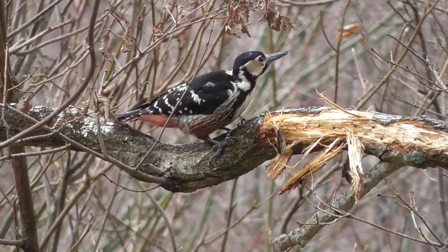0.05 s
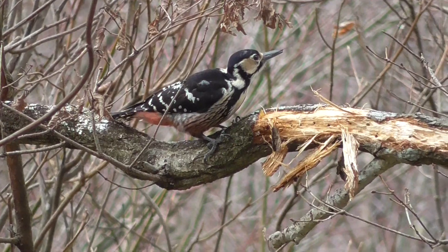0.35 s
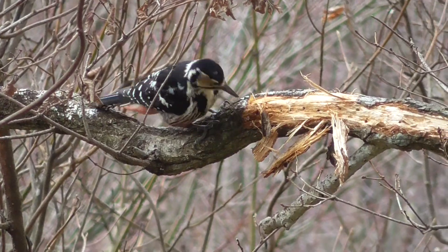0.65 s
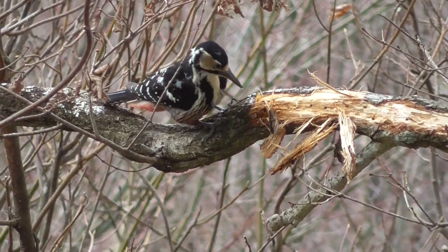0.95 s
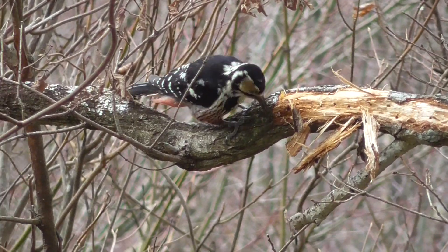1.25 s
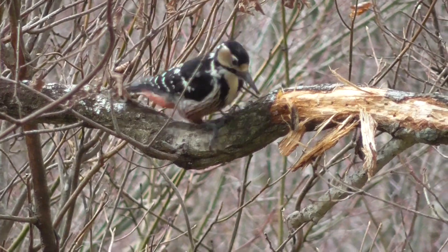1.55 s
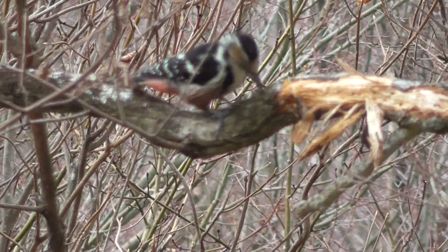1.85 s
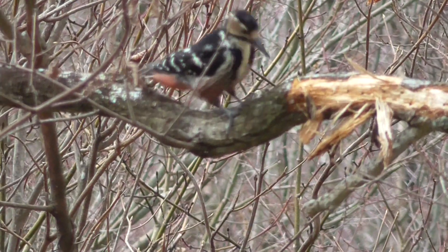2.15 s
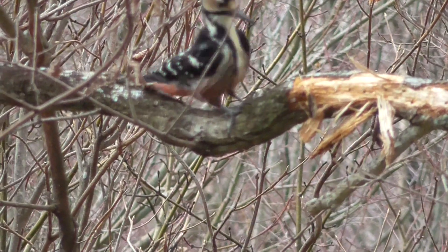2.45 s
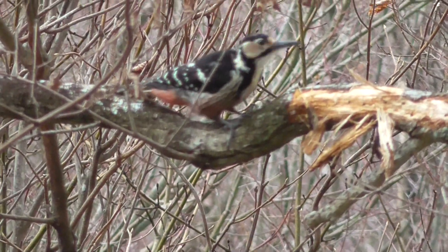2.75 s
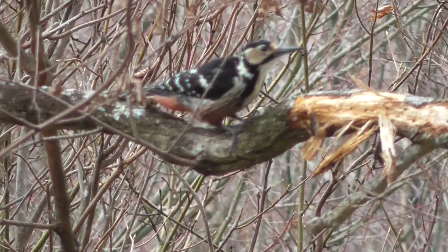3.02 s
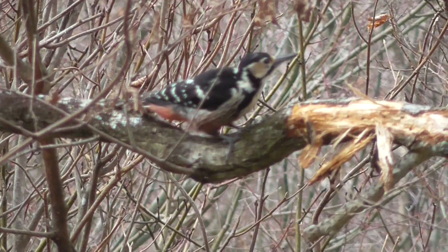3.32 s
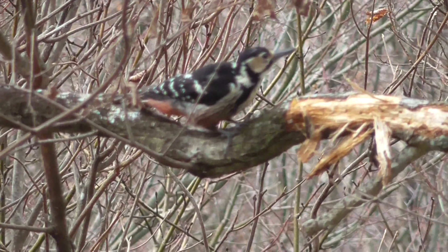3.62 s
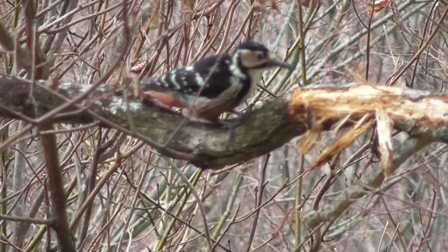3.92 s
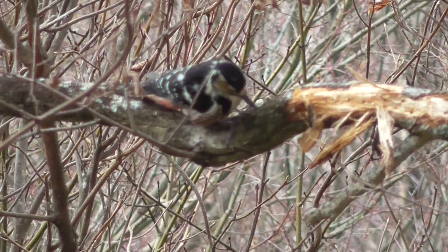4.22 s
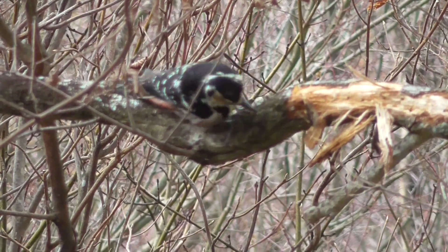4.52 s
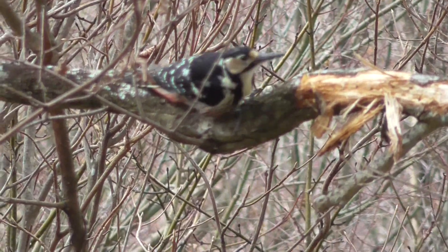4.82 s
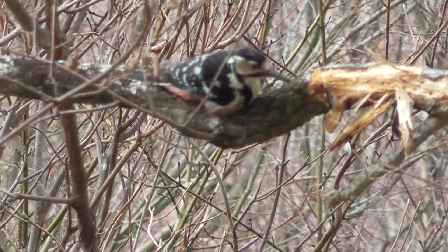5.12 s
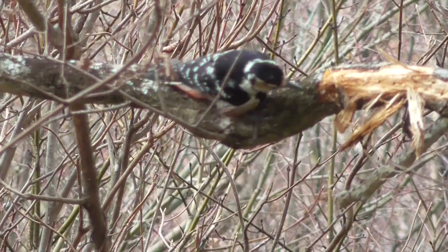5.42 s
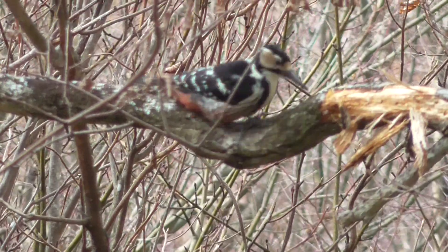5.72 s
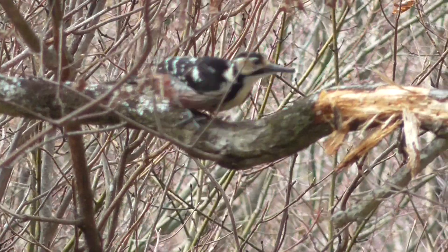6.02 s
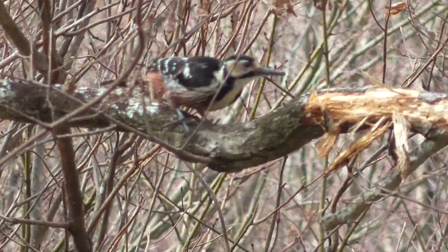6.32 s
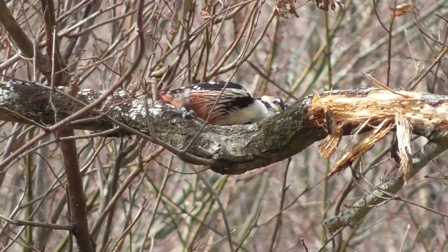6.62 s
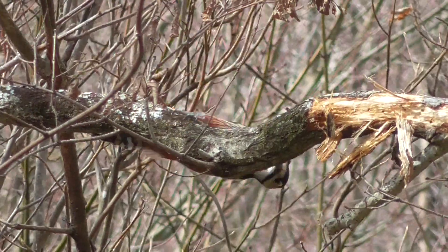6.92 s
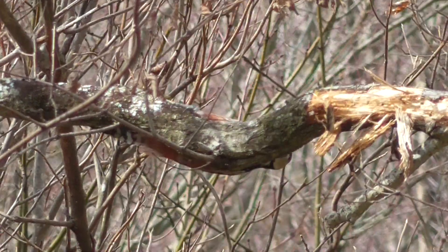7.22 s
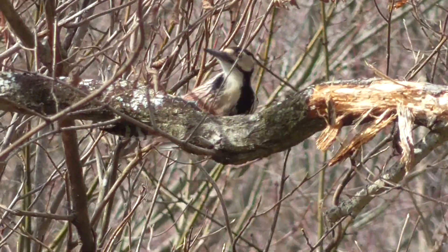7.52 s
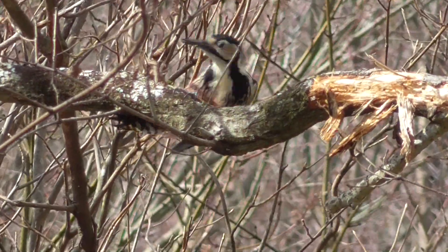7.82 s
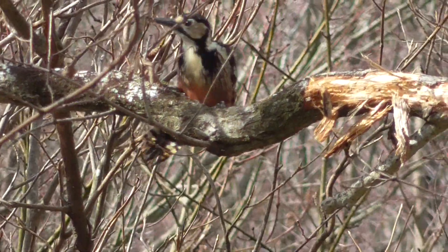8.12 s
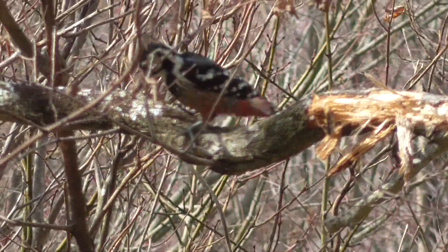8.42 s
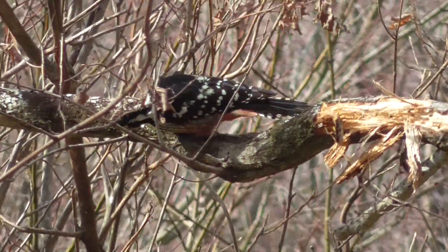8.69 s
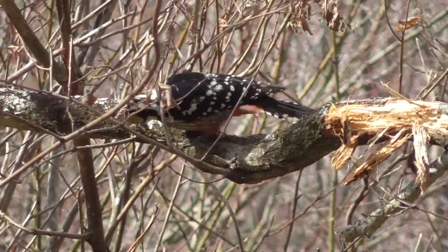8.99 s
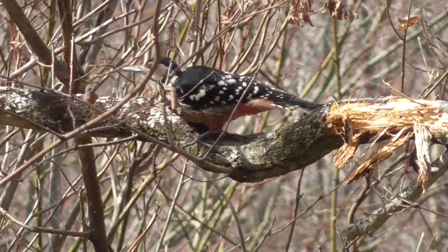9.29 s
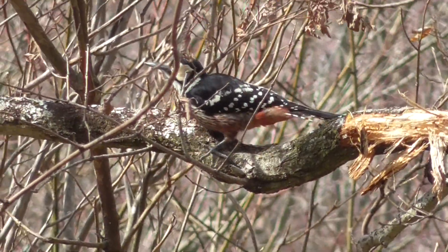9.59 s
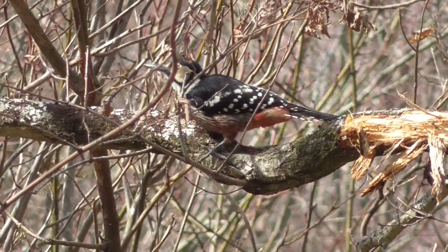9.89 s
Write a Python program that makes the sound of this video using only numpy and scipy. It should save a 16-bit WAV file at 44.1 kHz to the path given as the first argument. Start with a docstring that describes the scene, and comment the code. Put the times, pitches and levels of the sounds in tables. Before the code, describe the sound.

Gusty wind rumbles and thumps on the microphone while a woodpecker taps faintly and irregularly at a branch, snapping off bits of bark.

```python
"""Wind buffets a camera's two microphone ports in gusts and thumping eddies, over a bed of far forest
murmur and dry leaves hissing in the breeze. Through it a woodpecker works along a dead branch: bark
splinters snap, crumbs tick, the beak knocks the damp wood into a short ring and claws scrape, all
lightly scattered by the bare trunks. A faint, thin whine comes and goes."""
import sys
import numpy as np
from scipy import signal
from scipy.fft import rfft, irfft, next_fast_len
from scipy.io import wavfile
from scipy.ndimage import map_coordinates

SR = 44100
rng = np.random.default_rng(int(sys.argv[2]) if len(sys.argv) > 2 else 0)


def output_pcm(signal):
    """Save a mono or channel-first signal as 16-bit PCM at the path in sys.argv[1].

    Samples are clipped to [-1, 1] before scaling.
    """
    pcm = np.clip(np.atleast_2d(signal).T, -1, 1) * 32767
    wavfile.write(sys.argv[1], SR, np.round(pcm).astype(np.int16))


N = 438794

# draught on the ports: t/s, level/dB, left minus right/dB
DRAUGHT = [(0, -34.5, -4), (.08, -23.5, -10.5), (1.05, -24.5, -7), (1.3, -26.5, -10), (2.45, -27, -6.5),
           (2.52, -30.5, -8.5), (3.2, -27.5, -7), (3.3, -39, -3), (3.45, -36, -4), (4.08, -39, -3),
           (5.45, -33, -6.5), (5.99, -40.5, 1.5), (6.15, -26, -4.5), (6.25, -31.5, -3), (6.5, -26, -3),
           (6.9, -30, -4), (7.38, -34.5, -4), (7.8, -25.5, -9.5), (8.37, -24.5, -1), (8.46, -36, -13),
           (8.8, -26.5, -4), (8.89, -44, -12), (8.96, -32, -10), (9.95, -29.5, -8)]
# gusts riding on the draught: t/s, length/s, level/dB, left minus right/dB
PORT_GUSTS = [(1.201, 0.054, -23, -11), (1.622, .11, -22, -11.5), (1.839, 0.15, -22, -8.5),
              (2.308, 0.146, -23, -5.5), (2.628, 0.068, -21, -25), (2.785, 0.26, -23.5, -23),
              (3.425, 0.25, -29, -8), (3.729, 0.23, -30, -7.5), (4.224, 0.096, -28.5, 0.5),
              (4.449, 0.048, -26, -11), (4.528, 0.092, -27, -5), (4.865, 0.036, -25, -5),
              (5, 0.042, -27, 0), (5.116, 0.24, -25.5, 0.5), (6.589, 0.24, -20, -4), (7.44, 0.15, -23, -5),
              (7.847, 0.16, -17.5, -12), (8.07, 0.11, -21.5, -24), (8.54, 0.24, -39, -6.5),
              (9.02, 0.2, -24.5, -13), (9.242, 0.16, -24.5, -7), (9.529, 0.19, -19, -11),
              (9.739, 0.11, -18, -3.5)]
# tone of the buffeting: f/Hz, level/dB
BUFFET_SPECTRUM = [(15, -54), (30, -22), (50, -6.5), (75, 3), (140, 4.5), (230, -5.5), (330, -18.5),
                   (500, -34), (800, -47.5), (1500, -73), (3000, -90)]
# hard eddies hitting a port: t/s, peak/dB, f/Hz, port (L or R)
EDDY_HITS = [(0.17, -12.5, 174, "R"), (.428, -9.5, 207, "R"), (0.615, -11, 175, "R"),
             (.733, -7.5, 154, "R"), (.986, -9.5, 170, "R"), (1.055, -10, 158, "R"),
             (1.715, -25.5, 500, "R"), (1.916, -14, 153, "R"), (2.129, -18.5, 476, "R"),
             (2.281, -10.5, 174, "R"), (2.433, -21.5, 520, "R"), (2.473, -21, 436, "R"),
             (2.635, -13, 226, "R"), (2.668, -19.5, 432, "R"), (2.805, -5, 195, "R"), (2.857, -6, 184, "R"),
             (2.872, -10.5, 220, "R"), (2.928, -12, 161, "R"), (3.003, -21, 424, "R"),
             (3.244, -16, 150, "R"), (3.442, -9.5, 210, "R"), (3.515, -23, 400, "R"),
             (4.569, -12.5, 201, "R"), (4.894, -19, 196, "R"), (5.281, -19, 152, "L"),
             (6.271, -15.5, 143, "R"), (6.396, -11.5, 200, "R"), (6.595, -14, 197, "R"),
             (6.624, -8, 162, "R"), (6.64, -1, 138, "R"), (6.712, -23, 450, "R"), (6.785, -12, 139, "L"),
             (7.351, -21, 152, "R"), (7.656, -16.5, 194, "R"), (7.821, -8.5, 177, "R"),
             (7.892, -18, 368, "R"), (7.919, -10, 218, "R"), (8.278, -14, 155, "L"), (9.056, -13, 149, "R"),
             (9.318, -11, 133, "R"), (9.538, 0.5, 171, "R"), (9.559, -9.5, 310, "R"),
             (9.583, -12.5, 460, "R"), (9.706, -8, 140, "R"), (9.765, -8, 163, "R")]
# ride of the forest bed: t/s, level/dB
MURMUR_LEVEL = [(0, -53), (2, -54), (3.7, -55.5), (5.3, -54), (8, -53), (8.7, -53.5), (9.95, -53)]
# tone of the forest bed: f/Hz, level/dB
FOREST_SPECTRUM = [(30, 7), (120, 1.5), (300, 3.5), (700, -1.5), (1000, -5.5), (1400, -8.5), (1750, -17.5),
                   (2100, -15.5), (2800, -26.5), (5000, -22.5), (15000, -88)]
# ride of the breeze in the leaves: t/s, level/dB
BREEZE_LEVEL = [(0.0, -61), (0.25, -65), (0.69, -64), (2.19, -65.5), (3.4, -64.5), (3.95, -61),
                (4.3, -58.7), (5.8, -59), (8.53, -62.7), (9.95, -60.5)]
# tone of the dry leaves: f/Hz, level/dB
LEAF_SPECTRUM = [(800, -25), (2000, -1.5), (3000, 1.5), (4700, 4), (6200, 2.5), (8500, 5), (11000, 2.5),
                 (13500, -2.5), (16000, -8.5)]
# stereo width of both beds: f/Hz, side minus mid/dB
BED_WIDTH = [(100, -19), (400, -18), (800, -10), (1500, -8.5), (3000, -6.5), (5000, -5), (6500, -3),
             (8500, 3.5), (11000, -0.5), (15000, -1)]
# bark splinters breaking: t/s, peak/dB, f/Hz, crumble t60/s, ring trim/dB, wood trim/dB
SPLINTERS = [(0.113, -40, 3930, .012, 10, -14), (.347, -38.5, 4130, 0.0084, 2, -20),
             (.603, -41, 5350, 0.01, -5, -4), (.63, -41, 5000, .008, -6, -11),
             (.639, -33, 3910, 0.01, 2, -16), (.644, -36, 7200, 0.008, -10, -6.5),
             (.667, -54, 4500, 0.0089, -3, -6), (.695, -35.5, 3930, 0.017, 1, -17),
             (0.721, -46, 4500, 0.011, -3, 3), (0.748, -43, 3850, .02, 2, -6),
             (0.755, -45, 4400, 0.012, 0, -2), (0.774, -35, 3930, .013, 4, -20),
             (0.891, -43, 4000, .012, 1, -15), (1.153, -34.5, 5460, 0.0054, -7, -18),
             (1.354, -31.5, 8900, 0.0049, 5, -16), (1.6661, -32, 4100, 0.017, 2, -14.5),
             (1.671, -33.5, 9500, .013, 4, -17), (1.794, -40.5, 5030, 0.0078, 4, -5.5),
             (1.911, -39, 12000, 0.005, 10, -28), (2.576, -31, 4300, 0.0031, -10, -10),
             (3.32, -42, 4600, .008, 1, -22), (5.826, -34, 7000, 0.005, -6, -12),
             (5.833, -36, 5070, .011, 7, -8), (6.737, -30, 5000, 0.0023, -3, -11),
             (7.126, -31, 9000, 0.006, 5, -20), (8.949, -34.5, 7150, 0.007, 2, -15)]
# reverb of the trunks: f/Hz, t60/s
TRUNK_DECAY = [(300, 0.22), (2000, 0.14), (12000, 0.14)]
# spells of busy foraging: start/s, end/s, typical peak/dB, typical f/Hz
FORAGING_SPELLS = [(0.332, 1.148, -48, 1150), (1.402, 3.698, -52.5, 8400)]
# claw or beak tip flicking bark, and twigs touching: t/s, peak/dB, f/Hz
BARK_FLICKS = [(.404, -43.5, 1500), (.930, -47, 3200), (.940, -40.5, 2500), (1.04, -47, 1240),
               (2.178, -47, 1230), (2.576, -46, 3300), (2.936, -48, 9800), (3.028, -46, 9000),
               (3.701, -47, 1700), (6.33, -43, 8300), (6.472, -48, 2700), (6.835, -45, 2100),
               (6.87, -47.5, 1320), (7.115, -45, 3100), (8.11, -41, 9000)]
# beak on wood: t/s, peak/dB, f/Hz, crack re ring/dB, attack/s, decay factor
BEAK_HITS = [(0.348, -30.5, 860, -28, 0.00029, 0.66), (.445, -42, 880, -5, .001, 0.7),
             (.473, -41, 1120, 0, 0.00064, 0.66), (.744, -39.5, 970, -10, 0.0015, 1.3),
             (.877, -40, 715, -7, 0.0011, 1.1), (.970, -33.5, 820, -24, .0008, 0.61),
             (1.011, -38.5, 1200, -10, 0.00063, 0.55), (1.137, -48, 1200, 3, .002, 0.68),
             (1.1535, -26, 950, -12, 0.00031, 0.44), (1.354, -40, 800, -20, .0006, 1),
             (1.631, -43.5, 1290, -5, 0.0022, 1.4), (2.08, -44.5, 1350, -2, .001, 0.86),
             (3.134, -36, 1010, -34, 0.0031, 0.53), (3.181, -44, 1150, -20, .002, .7),
             (3.644, -37.5, 726, -29, 0.00072, 0.84), (4.681, -25.5, 725, -20, 0.017, .85),
             (4.769, -43, 890, -17, 0.0014, 0.92), (5.268, -41, 1130, -26, 0.0078, 0.83),
             (5.827, -43.5, 1150, -4, .001, 1), (6.014, -35, 720, -5.5, 0.00061, 0.73),
             (6.603, -38.5, 1300, -11, 0.0018, 0.63), (6.737, -31.5, 1150, -30, 0.0003, 0.42),
             (6.962, -42, 1360, -28, 0.0012, 0.79), (7.025, -28, 1290, -14, 0.0003, 0.62),
             (9.17, -33, 775, -27, 0.0011, 1.15), (9.828, -33, 704, -25, 0.0073, 1)]
# modes of the branch: ratio to the knock's pitch, level/dB, t60/s before the decay factor
BRANCH_MODES = [(.68, -20, 0.0042), (1, 6, 0.0095), (1.3, -4.5, 0.007), (1.9, -18, 0.0024)]
# claws scraping bark: t/s, length/s, level/dB, f/Hz
CLAW_SCRAPES = [(0.366, 0.18, -60, 1390), (0.56, 0.06, -64, 4000), (.66, 0.11, -64, 1400),
                (0.738, 0.024, -52, 4500), (0.93, 0.21, -57, 1020), (1.12, 0.059, -53.5, 1200),
                (2.044, 0.15, -59, 1070), (7.751, 0.56, -61.5, 1150), (8.42, .2, -62.5, 1350),
                (9.818, 0.056, -49.5, 850), (9.815, 0.32, -54.5, 1770), (9.82, 0.049, -55.5, 4000)]
# swells of the whine: t/s, length/s, level/dB
WHINE_SWELLS = [(.68, 0.5, -74), (2.0, 0.29, -72.5), (3.3, 0.35, -70), (3.92, .15, -68), (4.05, 0.44, -71),
                (8.46, .2, -68.5), (9.423, 0.13, -66)]
# soft rustles of leaves and feathers: t/s, length/s, level/dB, f/Hz
SOFT_RUSTLES = [(0.94, 0.18, -61.5, 6500), (4.36, 0.18, -54.5, 9500), (4.7, 0.11, -54, 9400),
                (8.95, 0.2, -54, 8000), (9.39, 0.16, -55, 7700)]


def amp(db):
    """Decibels to gain."""
    return 10 ** (np.asarray(db) / 20)


def unit(x):
    """Scale to rms 1."""
    return x / np.sqrt(np.mean(x ** 2) + 1e-20)


def peaked(x):
    """Scale to peak 1."""
    return x / (np.abs(x).max() + 1e-20)


def along(points, hz):
    """Read (f/Hz, value) points on a log axis."""
    f, v = np.transpose(points)
    return np.interp(np.log(hz + 1), np.log(f + 1), v)


def curves(rows):
    """One automation lane for each column after the time."""
    s, *cols = np.transpose(rows)
    return [np.interp(np.arange(N) / SR, s, c) for c in cols]


def wobble(rate, size=N):
    """Smooth random modulation, rate knots a second."""
    knots = rng.standard_normal(int(size * rate / SR) + 4)
    return map_coordinates(knots, [np.arange(size) * rate / SR], order=2)


def filtered(x, response):
    """Zero-phase EQ; response gives the gain at each frequency."""
    size = next_fast_len(N + SR // 4)
    return irfft(rfft(x, size) * response(np.fft.rfftfreq(size, 1 / SR)), size)[..., :N]


def band(x, hz, spread):
    """Band-pass from hz / spread to hz * spread, with both edges capped."""
    edges = [min(hz / spread, 12000), min(hz * spread, 15500)]
    return signal.sosfilt(signal.butter(2, edges, 'band', fs=SR, output='sos'), x)


def lowpass(x, hz):
    """Gentle treble roll-off."""
    return signal.sosfilt(signal.butter(2, hz, fs=SR, output='sos'), x)


def add(track, s, sound):
    """Mix a sound into the track at time s."""
    start = max(round(s * SR), 0)
    part = sound[..., :max(N - start, 0)]
    track[..., start:start + part.shape[-1]] += part


def diffuse(spectrum):
    """Stereo noise from all around, mid at rms 1."""
    mid, side = filtered(rng.standard_normal((2, N)), lambda hz: amp(along(spectrum, hz)))
    side = filtered(side, lambda hz: amp(along(BED_WIDTH, hz))) / np.std(mid)
    return np.array([unit(mid) + side, unit(mid) - side])


def flow_power(attack_s=0.023, release_s=0.022, sag_db=4):
    """Wind power at each port: the draught plus gusts that hit fast, sag and drop away."""
    t = np.arange(N) / SR
    pan = lambda lean_db: 1 / (1 + amp(np.outer([-2, 2], lean_db)))
    level_db, lean_db = curves(DRAUGHT)
    power = amp(level_db) ** 2 * pan(lean_db)
    for s, length, db, lean_db in PORT_GUSTS:
        rise = np.clip((t - s) / attack_s + .5, 0, 1)
        progress = np.clip((t - s) / length, 0, 1)
        release = np.exp(-np.clip((t - s - length) / release_s, 0, 20))
        power += (amp(db - sag_db * progress) * rise * release) ** 2 * pan(lean_db)
    return power


def buffet(level_db, lump_db=5.0, brighten=0.61):
    """Turbulence at one port: a flutter of short lumps, brighter when the flow is faster."""
    flow = unit(filtered(rng.standard_normal(N), lambda hz: amp(along(BUFFET_SPECTRUM, hz))))
    lumps = unit(amp(lump_db * np.tanh(wobble(rate=90))))
    highs = filtered(flow, lambda hz: 1 - 1 / (1 + (hz / 330) ** 4))
    speed = amp(level_db + 45.0) * lumps
    shelf_gain = speed ** brighten * amp(2.24 * wobble(rate=110))
    return amp(level_db) * lumps * (flow + highs * (shelf_gain - 1))


def wind(surge_db=1.32, crossfeed=0.25):
    """Unsteady flow on each port; the stereo circuit feeds each, inverted, to the other side."""
    levels_db = 10 * np.log10(flow_power()) + surge_db * wobble(rate=16)
    ports = np.array([buffet(level_db) for level_db in levels_db]) + eddies()
    return ports - crossfeed * ports[::-1]


def forest():
    """The far murmur of the forest: a dark bed, a touch to the left."""
    level_db, = curves(MURMUR_LEVEL)
    return amp(level_db + 0.098 * wobble(rate=7.7)) * diffuse(FOREST_SPECTRUM) * amp([[.5], [-.5]])


def leaves():
    """Dry leaves hiss with the breeze; the right port hears more of the very top."""
    level_db, = curves(BREEZE_LEVEL)
    hiss = amp(level_db + 0.95 * wobble(rate=19)) * diffuse(LEAF_SPECTRUM)
    return filtered(hiss, lambda hz: amp(np.outer([-1, 1], along([(6000, -0.32), (15000, 1.8)], hz))))


def self_noise(level_db=-71):
    """The microphone's own steady, fine hiss."""
    return amp(level_db) * unit(np.diff(rng.standard_normal((2, N + 1))))


def snaps():
    """A splinter parts with a crunch of fibres, which may set it ringing and tugs at the wood beneath."""
    out, t = np.zeros((2, N)), np.arange(SR // 16) / SR
    low_cut = signal.butter(4, 3200, 'high', fs=SR, output='sos')  # slivers radiate nothing low
    for s, db, hz, crumble_s, ring_db, wood_db in SPLINTERS:
        rise = 1 - np.exp(-t / (0.064 * crumble_s))
        decay = amp(-60 * t / crumble_s) + amp(-22 - 60 * t / 0.03)
        fibres = rng.standard_normal((2, len(t))) * rise * decay
        crunch = peaked(band(fibres, hz=np.sqrt(hz * 7800), spread=1.66))
        ring = peaked(band(fibres, hz=hz, spread=1.08))
        mid, side = signal.sosfilt(low_cut, crunch + amp(ring_db - 12) * ring)
        splinter = peaked(np.array([mid + 0.5 * side, mid - 1.36 * side]))
        wood = peaked(band(fibres[0], hz=950, spread=1.84))
        add(out, s, amp(db) * (splinter + amp(wood_db) * wood))
    return out


def trunk_reverb(x):
    """A thin scatter from the trunks around, different on each side."""
    hz, t, noise = signal.stft(rng.standard_normal((2, SR // 4)), SR, nperseg=256)
    tail = signal.istft(noise * amp(-60 * t / along(TRUNK_DECAY, hz)[:, None]), SR)[1]
    return signal.fftconvolve(x, tail / np.linalg.norm(tail[0]), axes=1)[:, :N]


def eddies(spill=0.19, wake_db=-21, wake_t60_s=0.032):
    """A hard eddy thumps one port, spills into the other and trails a ragged flutter."""
    out, t = np.zeros((2, N)), np.arange(-SR // 50, SR // 50) / SR
    for s, db, hz, port in EDDY_HITS:
        left = spill if port == "R" else 1 - spill
        spread = (np.pi * hz * t) ** 2
        thump = (1 - 2 * spread) * np.exp(-spread)  # suction, push, suction
        decay = (t > 0) * amp(-60 * np.abs(t) / wake_t60_s)
        wake = peaked(band(rng.standard_normal(len(t)) * decay, hz=400, spread=1.26))
        add(out, s + t[0], np.outer([left, 1 - left], amp(db) * (thump + amp(wake_db) * wake)))
    return out


def ticks(per_s=20, t60_cycles=28, scatter_db=2.5, scatter_octaves=0.3):
    """Bark crumbs are flicked away: a few clear ticks, and many faint ones while the bird is busy."""
    out, t = np.zeros((2, N)), np.arange(SR // 25) / SR
    cues = list(BARK_FLICKS)
    for start, end, db, hz in FORAGING_SPELLS:
        count = int((end - start) * per_s)
        for s, (size, pitch) in zip(rng.uniform(start, end, count), rng.standard_normal((count, 2))):
            cues.append((s, db + scatter_db * size, hz * 2 ** (scatter_octaves * pitch)))
    for s, db, hz in cues:
        burst = rng.standard_normal(len(t)) * amp(-60 * t * hz / t60_cycles)
        add(out, s, amp(db) * peaked(band(burst, hz=hz, spread=1.37)))
    return out


def knocks():
    """The beak cracks the surface; the damp wood swells, rings a few cycles and leaves a dull rattle."""
    out, t = np.zeros((2, N)), np.arange(SR // 12) / SR
    for s, db, hz, crack_db, attack_s, sustain in BEAK_HITS:
        rise = 1 - np.exp(-t / attack_s)
        hardness = 1 / (1 + (attack_s / 0.009) ** 2)  # a slow, soft blow wakes little but the main mode
        ring = np.zeros(len(t))
        for ratio, mode_db, t60 in BRANCH_MODES:
            decay = amp(mode_db + rng.standard_normal() - 60 * t / (t60 * sustain))
            drive = hardness ** min(3 * abs(ratio - 1), 1)
            ring += rise * decay * drive * np.sin(2 * np.pi * hz * ratio * t)
        noise = rng.standard_normal((2, len(t))) * rise
        crack = peaked(band(noise[0] * amp(-60 * t / (0.013 * sustain)), hz=2660, spread=1.94))
        rattle = peaked(band(noise[1] * amp(-60 * t / 0.026), hz=hz * 1.1, spread=1.45))
        hit = peaked(ring) + amp(crack_db) * crack + hardness * sustain * amp(-5) * rattle
        add(out, s, amp(db) * hit)
    return out * amp([[.7], [-.7]])  # a touch to the left


def friction(cues, clump_db, grit_db):
    """Tiny catches bunch into clumps under a smooth stroke: claws on bark, or leaves and feathers."""
    out = np.zeros((2, N))
    for s, length, db, hz in cues:
        size = int(length * SR)
        clumps = amp(clump_db * wobble(rate=440, size=size))
        grit = rng.standard_normal((2, size)) * amp(grit_db * rng.standard_normal(size))
        mid, side = band(grit * clumps, hz=hz, spread=1.65)
        add(out, s, amp(db) * unit(np.array([mid + .5 * side, mid - .5 * side])) * np.hanning(size))
    return out


def whine(hz=4271, waver_db=2.5):
    """A faint, unsteady tone that comes and goes."""
    swell = np.zeros(N)
    for s, length, db in WHINE_SWELLS:
        add(swell, s, amp(db) * np.hanning(int(length * SR)))
    cycles = hz * np.arange(N) / SR + wobble(rate=50) / 10
    return amp(waver_db * wobble(rate=22)) * swell * np.sin(2 * np.pi * cycles)


def scene():
    """The mix: wind up close, the beds behind, and the bird alone sent to the reverb."""
    outdoors = wind() + forest() + leaves() + whine()
    scrapes = friction(CLAW_SCRAPES, clump_db=4.5, grit_db=-0.5)
    rustles = friction(SOFT_RUSTLES, clump_db=5.0, grit_db=-1.0)
    bird = knocks() + snaps() + lowpass(scrapes + rustles, hz=12000) + ticks()
    bird = lowpass(bird, hz=14800)  # distance dulls the top
    return bird + amp(-9) * trunk_reverb(bird) + outdoors + self_noise()


def record(dry, low_cut_hz=27, top_hz=15830):
    """The camera sheds the deepest bass, soft-clips at full scale and cuts all above its band limit."""
    lean = filtered(dry, lambda hz: 1 - 1 / (1 + (hz / low_cut_hz) ** 4))
    rounded = lean / (1 + lean ** 6) ** (1 / 6)
    return filtered(rounded, lambda hz: hz < top_hz)


dry = scene()
out = record(dry)
output_pcm(out)
```